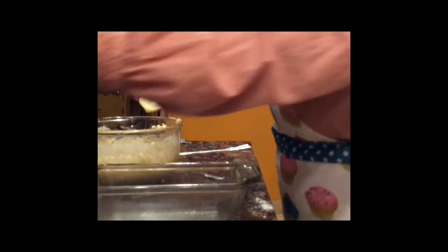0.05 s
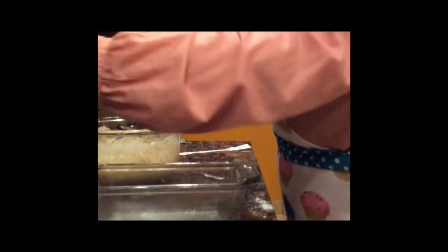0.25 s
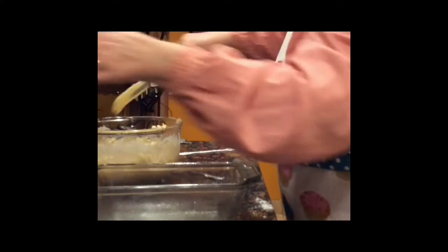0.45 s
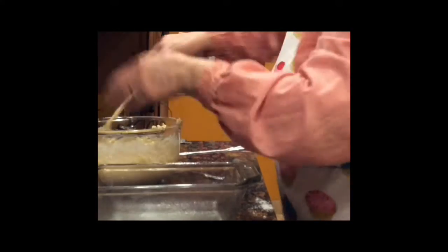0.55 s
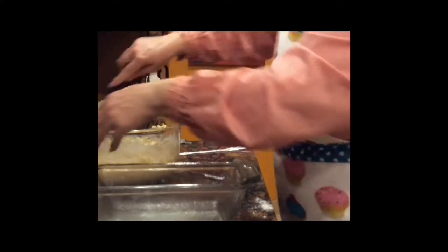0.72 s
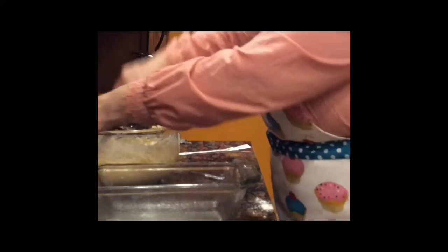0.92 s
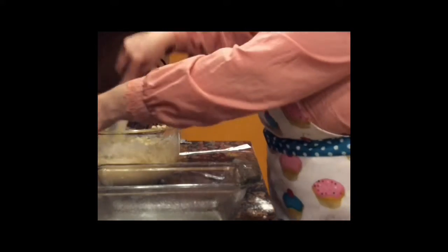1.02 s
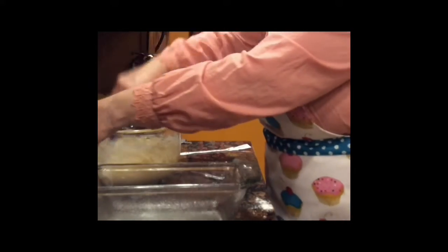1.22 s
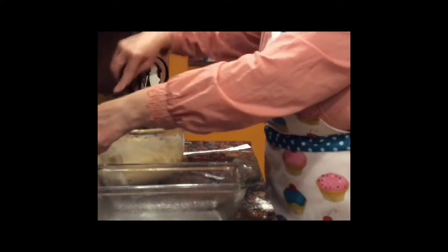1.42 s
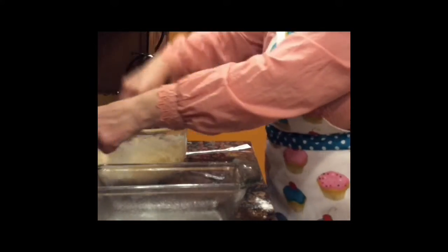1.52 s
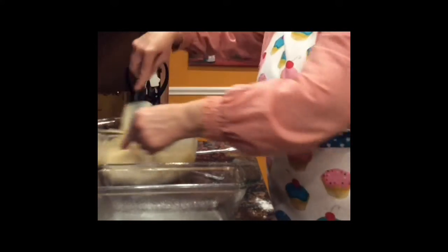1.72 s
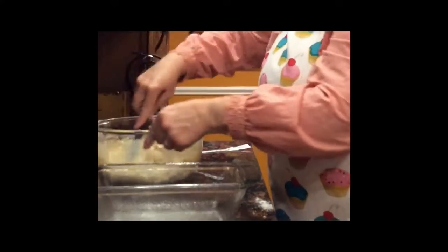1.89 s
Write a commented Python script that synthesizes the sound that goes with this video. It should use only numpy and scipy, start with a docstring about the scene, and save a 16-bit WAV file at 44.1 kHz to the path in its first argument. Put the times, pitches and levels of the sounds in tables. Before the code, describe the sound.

Two ringing knocks of a glass mixing bowl, followed by faint spatula wipes and clinks.

```python
"""Over a low mains hum and a faint first wipe, a heavy glass bowl of batter is knocked twice on a
kitchen worktop. Its base rocks and clacks, a loose utensil jingles and the glass rings out.
A rubber spatula then wipes round the bowl in soft hissing strokes, with light taps on the wall
and tiny ticks as the batter lets go. Thin metal clinks at the end.
A small room answers every hit and ring."""
import sys
import numpy as np
from scipy import signal
from scipy.fft import rfft, irfft, next_fast_len
from scipy.io import wavfile

SR = 44100
rng = np.random.default_rng(int(sys.argv[2]) if len(sys.argv) > 2 else 0)


def transcribe(u):
    """Save the signal u as a 16-bit wav file named by the first command-line argument.

    u: samples, shape (n,) or (channels, n), limited to [-1, 1]; the rate is SR.
    q: integer samples, one column per channel.
    """
    v = np.clip(np.atleast_2d(u).T, -1, 1)
    q = np.round(v * 32767).astype(np.int16)
    wavfile.write(sys.argv[1], SR, q)


N = 85995
T = np.arange(N) / SR

# Colour of the room tone. Each row: frequency in Hz, relative level in dB.
AIR_COLOUR = [(25, -50.5), (40, -27), (55, -14), (80, -15.5), (120, -7.5), (165, -11), (230, -17),
              (300, -12.5), (450, -19.5), (750, -23.5), (1950, -32.5), (2800, -39.5), (15500, -43.5)]
# Mains hum. Each row: frequency in Hz, level in dB.
HUM_PARTIALS = [(59, -62.5), (115, -63.5)]
# Reverb length. Each row: frequency in Hz, t60 in seconds.
ROOM_DECAY = [(100, .38), (500, 0.36), (2000, 0.4), (5000, .31), (14000, 0.29)]

# Batter leaving the blade. Each row: start in seconds, level in dB.
BATTER_TICKS = [(1.045, -61), (1.082, -63), (1.134, -61)]
# Bright tick of batter and metal. Each row: frequency in Hz, relative level in dB.
TICK_COLOUR = [(1000, -8.5), (4500, -1.5), (9000, -3), (14000, -2), (16000, -2.5)]
# Touches on thin metal. Each row: start in seconds, ring level in dB, tick level in dB.
CLINKS = [(1.746, -58, -74), (1.832, -60.5, -72), (1.8763, -50, -45.5), (1.917, -54, -56.5)]
# The metal's shimmer. Each row: frequency in Hz, relative level in dB, t60 in seconds.
METAL_MODES = [(4370, -3.5, .25), (5720, -4.5, 0.38), (7700, -2, 0.16), (9250, -0.5, 0.29),
               (10190, -6.5, 0.35), (11380, 4, 0.27), (12130, -16, .25), (13150, 1, .2), (13790, -10, 0.27),
               (14300, -7, .2)]
# Spatula taps. Each row: start in seconds, level in dB, pitch in Hz, gain of the bowl's ring in dB.
TAPS = [(.866, -57, 850, -43), (.977, -54.5, 3000, -38), (1.6181, -44.5, 1530, -33),
        (1.904, -49, 2000, -34.5)]
# Damped tock of a tap. Each row: frequency in Hz, relative level in dB, t60 in seconds.
TAP_MODES = [(488, -13, .15), (1075, 1, 0.11), (1170, -7.5, 0.17), (1816, -2, 0.06), (4000, -9.5, 0.055)]
# Spatula wipes. Each row: peak time in seconds, level in dB, rise and fall in seconds per 20 dB.
STROKES = [(.14, -67, .35, 0.7), (.995, -59, 0.19, 0.25), (1.047, -55.5, .01, 0.05),
           (1.083, -59.5, 0.03, 0.1), (1.349, -60.5, 0.163, 0.22), (1.404, -66.5, 0.076, .17),
           (1.634, -58, 0.044, 0.53), (1.71, -67.5, 0.11, 1), (1.9, -59.5, .13, 1.2)]
# Hiss of rubber on glass. Each row: frequency in Hz, relative level in dB.
WIPE_COLOUR = [(200, -4.5), (600, 7), (1500, -3), (3500, 1), (6000, -2), (10000, -1), (14000, -3),
               (16000, -8.5)]

# A loose utensil. Each row: frequency in Hz, level in dB, t60 in seconds.
UTENSIL_MODES = [(5968, -47, .18), (7896, -46.5, .14), (8080, -46, 0.16), (9420, -45, .12),
                 (9500, -42.5, .15), (10500, -51.5, .18), (11800, -53, .2), (12100, -63, .18),
                 (14590, -64.5, .18)]
# Glass meeting the worktop. Each row: start in seconds, then bump, thud and clack levels in dB.
CONTACTS = [(0.199, -56.5, -48.5, -59), (0.2077, -25.5, -24.5, -19.5), (0.2129, -44, -29.5, -19),
            (0.217, -37.5, -13, -38.5), (0.2414, -38.5, -25, -37.5), (.2655, -51, -42, -36),
            (0.3436, -28.5, -21, -21), (0.3469, -43, -30.5, -18.5), (0.364, -38.5, -32, -35.5)]
# Low bump, dull thud and hard clack. Each row: frequency in Hz, relative level in dB.
BUMP_COLOUR = [(45, -34.5), (85, -6.5), (170, -0.5), (280, -5), (600, -27.5), (2000, -61.5)]
THUD_COLOUR = [(80, -40), (250, -15.5), (380, -4.5), (750, 3), (1050, -7.5), (1600, -24.5), (3000, -40),
               (8000, -69.5)]
CLACK_COLOUR = [(100, -18.5), (500, -4.5), (1100, -5), (1550, 1.5), (2200, -7), (2900, -6), (4100, -23),
                (5300, -19.5), (6600, -34.5), (11000, -38), (16000, -46.5)]
# The bowl is set down, then knocked. Each row: start in seconds, gain of the ring in dB.
BLOWS = [(.2125, -0.5), (.3445, 0)]
# The voice of the glass; the close pair beats.
# Each row: frequency in Hz, level in dB when set down, level in dB when knocked, t60 in seconds.
BOWL_MODES = [(177.2, -34.5, -43, 0.41), (391.2, -21.5, -34.5, 0.13), (519.2, -22, -36, 0.14),
              (553.6, -27.5, -20, 0.1), (652.4, -18, -28.5, 0.21), (779, -27, -20.5, 0.26),
              (838, -22, -37.5, 0.097), (981, -26, -41.5, .2), (1033, -19.5, -31.5, 0.14),
              (1540, -42, -28, .2), (1585, -29.5, -17, 0.12), (1627, -36.5, -41, .5), (1917, -31, -28, .42),
              (1926, -35, -30, .42), (3470, -31.5, -28.5, 0.27), (5410, -46, -51, 0.25)]


def amp(db):
    """Decibels to gain."""
    return 10 ** (np.asarray(db) / 20)


def unit(x):
    """Scale to rms 1."""
    return x / np.sqrt(np.mean(x ** 2) + 1e-20)


def along(points, hz):
    """Read a curve of (Hz, value) points on a log frequency axis."""
    freqs, values = np.transpose(points)
    return np.interp(np.log(hz + 1), np.log(freqs + 1), values)


def filtered(x, response):
    """EQ x with a gain given as a function of Hz."""
    size = next_fast_len(N + 8192)
    return irfft(rfft(x, size) * response(np.fft.rfftfreq(size, 1 / SR)), size)[:N]


def noise(colour):
    """Coloured noise of rms 1."""
    return unit(filtered(rng.standard_normal(N), lambda hz: amp(along(colour, hz))))


def band(centre_hz, width):
    """Noise in one resonance; width is a share of the centre."""
    return unit(filtered(rng.standard_normal(N), lambda hz: 1 / (1 + ((hz / centre_hz - 1) / width) ** 2)))


def wobble(rate, t=T):
    """Smooth random modulation, rate knots a second."""
    knots = rng.standard_normal(N // 20)
    k, part = np.divmod(t * rate, 1)
    k = k.astype(int) % (len(knots) - 1)
    return knots[k] + (knots[k + 1] - knots[k]) * part * part * (3 - 2 * part)


def since(s, t60):
    """First sample after s, and the times from there until a ring has died."""
    start = int(np.ceil(s * SR))
    return start, T[start:start + int(2 * t60 * SR)] - s


def fade(t, t60, attack):
    """Quick rise, then an exponential decay."""
    return (1 - np.exp(-t / attack)) * np.exp(-np.log(1000) * t / t60)


def struck(s, t60, attack):
    """The envelope of a hit at s seconds."""
    out = np.zeros(N)
    start, t = since(s, t60)
    out[start:start + len(t)] = fade(t, t60, attack)
    return out


def bursts(colour, hits, t60, attack=0.00027):
    """Coloured noise that flares and dies at each (seconds, dB)."""
    return noise(colour) * np.sqrt(sum((amp(db) * struck(s, t60, attack)) ** 2 for s, db in hits))


def ring(s, modes, attack, scatter_db, blur):
    """Decaying modes, their phase wavering by about blur radians."""
    out = np.zeros(N)
    for hz, db, t60 in modes:
        start, t = since(s, t60)
        level = amp(db + scatter_db * rng.standard_normal()) * fade(t, t60, attack)
        out[start:start + len(t)] += level * np.sin(2 * np.pi * hz * t + blur * wobble(70, t))
    return out


def rattle(s, modes, attack, grain, rate):
    """Decaying modes of a loose object; grain is the share that flutters at random."""
    out = np.zeros(N)
    for hz, db, t60 in modes:
        start, t = since(s, t60)
        flutter = np.sqrt(1 - grain) + np.sqrt(grain / 2) * (wobble(rate, t) + 1j * wobble(rate, t))
        tone = np.imag(flutter * np.exp(2j * np.pi * hz * t))
        out[start:start + len(t)] += amp(db) * fade(t, t60, attack) * tone
    return out


def room_tone():
    """The bed: soft air and a wavering mains hum."""
    hum = sum(amp(db) * np.sqrt(2) * np.sin(2 * np.pi * hz * T + 0.35 * wobble(8.9))
              for hz, db in HUM_PARTIALS)
    return hum + amp(-59.5) * noise(AIR_COLOUR)


def kitchen_reverb(send):
    """A small room's tail; each frequency dies at its own speed."""
    hz, t, spectrum = signal.stft(rng.standard_normal(SR * 3 // 4), SR, nperseg=256)
    decay = np.exp(-np.log(1000) * t / along(ROOM_DECAY, hz)[:, None])
    tail = signal.istft(spectrum * decay, SR, nperseg=256)[1]
    tail *= 1 - np.exp(-(T[:len(tail)] / 0.005) ** 2)  # reflections build over 5 ms
    return signal.fftconvolve(send, tail / np.linalg.norm(tail))[:N]


def batter_ticks():
    """Batter lets go of the blade in tiny sticky ticks."""
    return bursts(TICK_COLOUR, BATTER_TICKS, t60=0.044, attack=0.0005)


def metal_clinks():
    """Thin metal is touched: a high shimmer with a tick on its front."""
    return sum(amp(ring_db) * rattle(s, METAL_MODES, attack=0.00224, grain=0.96, rate=190)
               + amp(tick_db) * noise(TICK_COLOUR) * struck(s, t60=0.097, attack=0.00188)
               for s, ring_db, tick_db in CLINKS)


def spatula_taps():
    """The spatula touches the wall with a short, damped tock."""
    out = np.zeros(N)
    for s, db, hz, _ in TAPS:
        touch = band(hz, width=0.45) * struck(s, t60=0.047, attack=0.00027)
        tock = ring(s, TAP_MODES, attack=0.0016, scatter_db=3, blur=0.58)
        out += amp(db) * (touch + tock)
    return out


def spatula_wipes(pops_per_s=670):
    """Grainy friction hiss and a fine sticky crackle swell with each stroke."""
    swells = [amp(db - 20 * np.maximum((s - T) / rise, (T - s) / fall)) for s, db, rise, fall in STROKES]
    pressure = np.sqrt(sum(swell ** 2 for swell in swells))
    hiss = unit(noise(WIPE_COLOUR) * amp(2 * wobble(650)))
    pops = (rng.random(N) < pops_per_s / SR) * amp(1.5 * rng.standard_normal(N))
    grain = rng.standard_normal(SR // 500) * np.hanning(SR // 500)  # each pop is 2 ms of noise
    grains = signal.fftconvolve(pops, grain)[:N]
    crackle = unit(filtered(grains, lambda hz: amp(along(WIPE_COLOUR, hz))))
    return pressure * (hiss + amp(-4.5) * crackle)


def utensil_jingle():
    """The first blow shakes a loose utensil."""
    return rattle(0.216, UTENSIL_MODES, attack=0.0015, grain=0.55, rate=150)


def bowl_knocks():
    """The base lands and rocks; each contact layers a bump, a thud and a clack."""
    starts, bump_db, thud_db, clack_db = np.transpose(CONTACTS)
    return (bursts(BUMP_COLOUR, zip(starts, bump_db), t60=0.054)
            + bursts(THUD_COLOUR, zip(starts, thud_db), t60=0.054)
            + bursts(CLACK_COLOUR, zip(starts, clack_db), t60=0.051))


def bowl_ring(rubber_cutoff_hz=1110):
    """The glass rings after each blow and, faint and dull, after each tap of soft rubber."""
    set_down = [(hz, db, t60) for hz, db, _, t60 in BOWL_MODES]
    knocked = [(hz, db, t60) for hz, _, db, t60 in BOWL_MODES]
    hard = sum(amp(db) * ring(s, modes, attack=0.0015, scatter_db=0.5, blur=0.27)
               for (s, db), modes in zip(BLOWS, (set_down, knocked)))
    soft = sum(amp(db) * ring(s, knocked, attack=0.0015, scatter_db=3.5, blur=0.3) for s, _, _, db in TAPS)
    settle = amp(-2.5 * np.clip((T - 0.48) / 0.028, 0, 1))  # coming to rest checks the ring
    return hard * settle + filtered(soft, lambda hz: 1 / (1 + 1j * hz / rubber_cutoff_hz) ** 2)


def scene():
    """The mono mix: hits feed the reverb, the glass has a lower send, the wipes stay dry."""
    hits = bowl_knocks() + utensil_jingle() + spatula_taps() + metal_clinks() + batter_ticks()
    glass = bowl_ring()
    reverb = amp(-7) * kitchen_reverb(hits + amp(-8.5) * glass)
    return (hits + glass + reverb + spatula_wipes() + room_tone())[None]


def record(dry, low_cut_hz=57, top_hz=15850):
    """Master EQ: roll off the deep bass and cut the very top."""
    low_cut = signal.butter(4, low_cut_hz, "highpass", fs=SR, output="sos")
    return filtered(signal.sosfilt(low_cut, dry[0]), lambda hz: hz < top_hz)[None]


dry = scene()
out = record(dry)
transcribe(out)
```